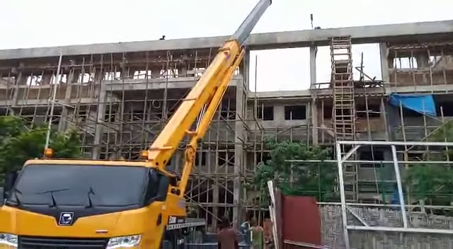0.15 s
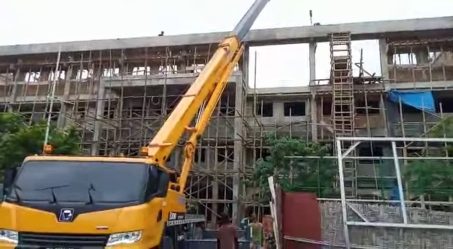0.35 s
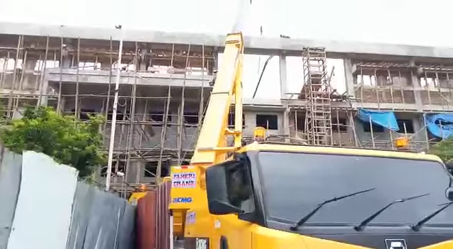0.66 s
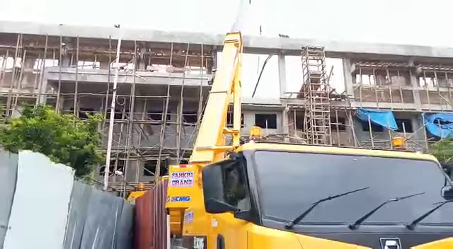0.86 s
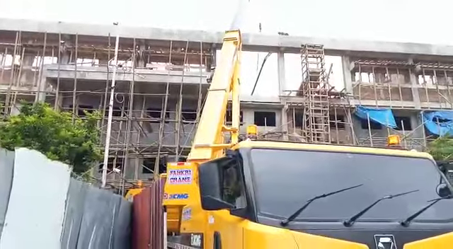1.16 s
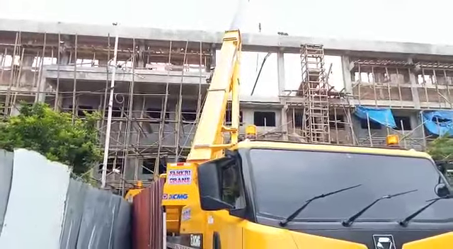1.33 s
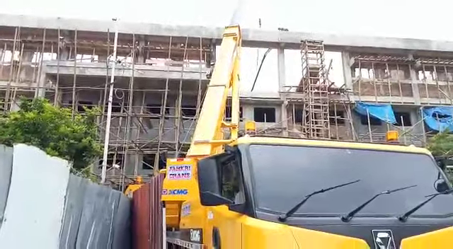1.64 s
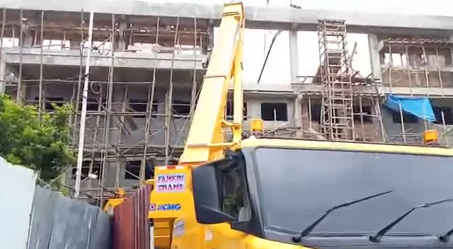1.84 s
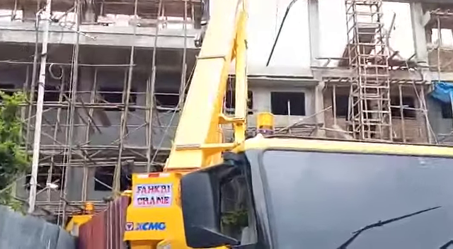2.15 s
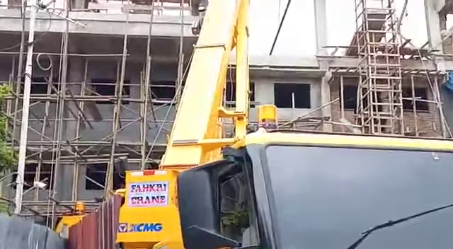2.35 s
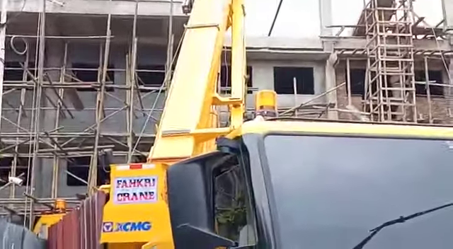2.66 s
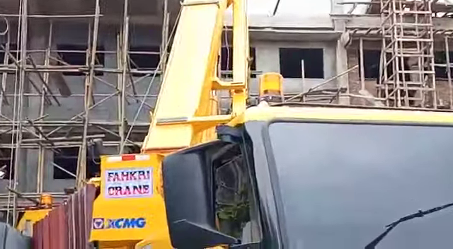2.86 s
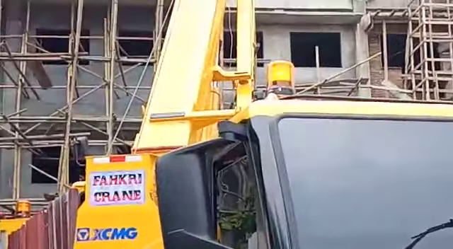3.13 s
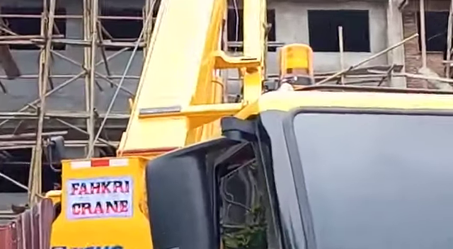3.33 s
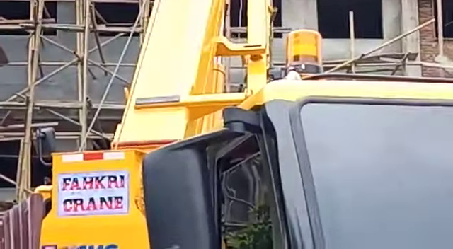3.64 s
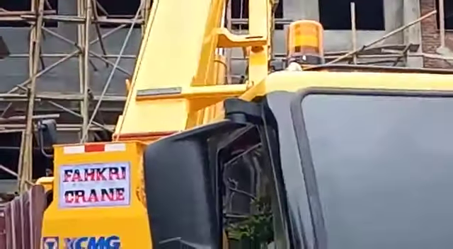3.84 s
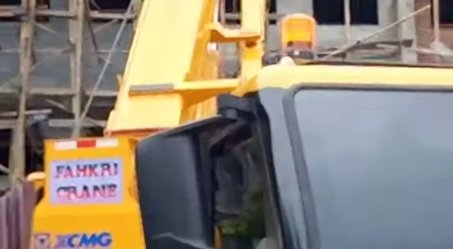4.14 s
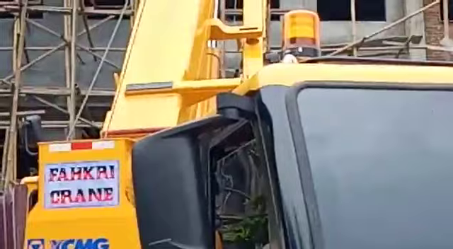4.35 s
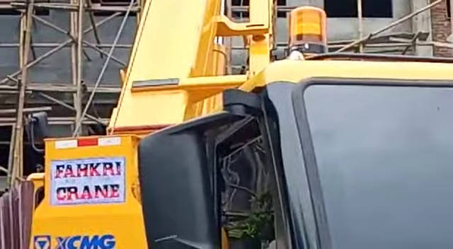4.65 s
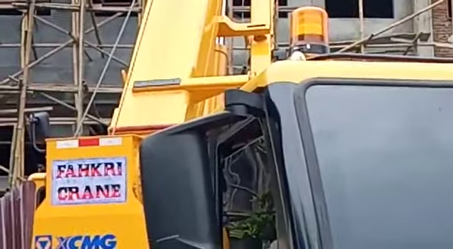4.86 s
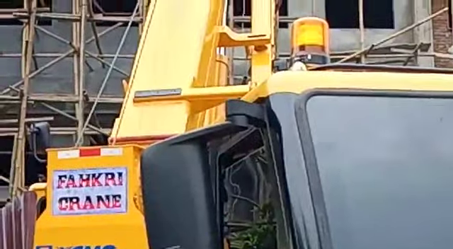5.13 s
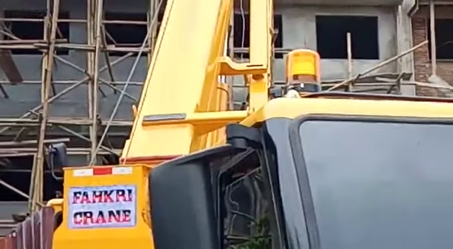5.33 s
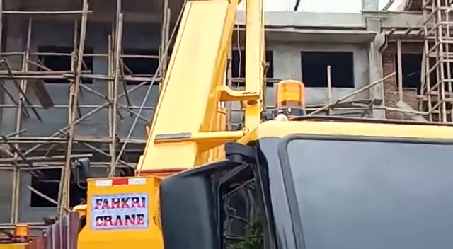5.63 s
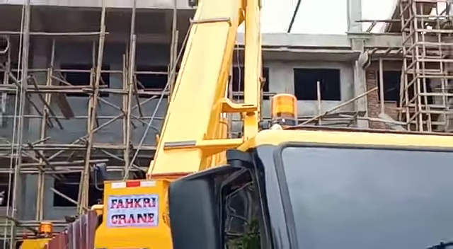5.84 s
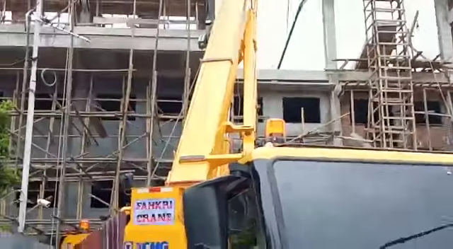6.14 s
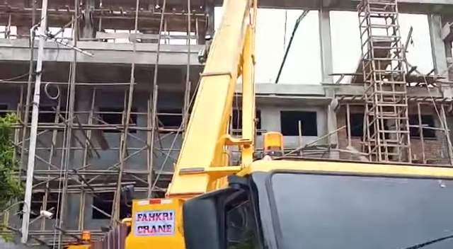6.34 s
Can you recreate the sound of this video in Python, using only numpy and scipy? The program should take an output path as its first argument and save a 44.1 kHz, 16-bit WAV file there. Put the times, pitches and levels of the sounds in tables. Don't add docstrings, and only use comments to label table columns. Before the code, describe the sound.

Steady heavy diesel idle on a building site: humming pumps, rattling valves and roaring cooling air, with one very brief early dropout and small click.

```python
import sys
import numpy as np
from scipy import signal
from scipy.fft import rfft, irfft, next_fast_len
from scipy.io import wavfile
from scipy.ndimage import uniform_filter1d, map_coordinates

SR = 44100
rng = np.random.default_rng(int(sys.argv[2]) if len(sys.argv) > 2 else 0)


def attenuation_scalar(level_db):
    decades = np.asarray(level_db, float) / 20
    return 10 ** decades


def store_pcm(level_fs):
    pcm = np.round(np.clip(level_fs, -1, 1) * 32767).astype(np.int16)
    wavfile.write(sys.argv[1], SR, np.atleast_2d(pcm).T)


N = 286209
T_S = np.arange(N) / SR
FFT_SIZE = next_fast_len(N)
HZ = np.fft.rfftfreq(FFT_SIZE, 1 / SR)

CYCLE_HZ = 6.6655
SPLICE_S = 0.398


def level(x, rms_db):
    return x * attenuation_scalar(rms_db) / np.sqrt(np.mean(x ** 2))


def shape(points):
    hz, db = np.transpose(points)
    return attenuation_scalar(np.interp(np.log(HZ + 1), np.log(hz), db))


def colour(x, gain):
    return irfft(rfft(x, FFT_SIZE) * gain, FFT_SIZE)[:N]


def walk(rate_hz):
    hold = int(SR / rate_hz)
    held = np.repeat(rng.standard_normal(N // hold + 1), hold)
    slewed = uniform_filter1d(uniform_filter1d(held, hold), hold)
    return 1.3 * slewed[:N]


def sine(turns):
    return np.sqrt(2) * np.sin(2 * np.pi * turns)


def crank_cycles():
    wander_s = 110e-6 * walk(1.2) + 22e-6 * walk(5)
    return CYCLE_HZ * (T_S + wander_s)


def cycle_pattern():
    # (block thud [dB], injector tick [dB], valve clack [dB])
    cylinders = [(-7, -12, -7), (0, -1, -8), (-12, -8, -9), (-7, -5, -12), (-3, -5, 0), (-5, -1, -7)]
    thud_hz, tick_hz, clack_hz = (650, 1193), (2510, 3250), (710, 1220, 1885, 2644)
    first_firing_s, valve_lag_s = 0.014, 0.0085
    rise_s, decay_s = 0.0004, 0.0018

    size = int(SR / CYCLE_HZ)
    t = np.arange(size) / SR
    wave = rng.standard_normal(size)
    envelope = np.ones(size)
    scatter_s = 0.0025 * rng.standard_normal((len(cylinders), 3))
    for k, strengths_db in enumerate(cylinders):
        fires_s = first_firing_s + k / len(cylinders) / CYCLE_HZ
        starts_s = fires_s + np.array([0, 0, valve_lag_s]) + scatter_s[k]
        for start_s, knock_db, rings_hz in zip(starts_s, strengths_db, (thud_hz, tick_hz, clack_hz)):
            age_s = (t - start_s) % (size / SR)
            burst = np.exp(-age_s / decay_s) * (1 - np.exp(-age_s / rise_s))
            ringing = sum(np.sin(2 * np.pi * hz * age_s) for hz in rings_hz)
            wave += attenuation_scalar(knock_db + 3) * burst * ringing
            envelope += attenuation_scalar(knock_db - 8) * burst
    return wave / wave.std(), envelope / envelope.mean()


def air(envelope):
    out, swell = 0, walk(0.62)
    for centre_hz in 30 * 2.0 ** np.arange(10):
        octaves = np.clip(np.log2((HZ + 1) / centre_hz), -1, 1)
        band = colour(rng.standard_normal(N), np.cos(np.pi / 2 * octaves))
        puff = envelope if centre_hz > 400 else 1
        flicker_db = 0.2 * swell + 0.35 * walk(2) + 0.7 * walk(10)
        out = out + band * puff * attenuation_scalar(flicker_db)
    return out / out.std()


def brightening_db():
    facing_db, turn_s = 2.5, 0.5
    return_s, return_db_per_s = 5.2, 0.7
    since_s = np.maximum(T_S - SPLICE_S, 0)
    facing = facing_db * np.exp(-(since_s / turn_s) ** 2)
    return facing + return_db_per_s * np.maximum(T_S - return_s, 0)


def engine_noise():
    # (frequency [Hz], density [dB per Hz])
    rumble_colour = [(12, -65.5), (20, -40.5), (66, -11), (123, 3), (161, 3), (244, -2), (295, 0), (346, 1),
                     (419, -4), (468, -6.5), (549, -9), (676, -18), (900, -23), (1170, -43), (1980, -120)]
    # (frequency [Hz], density [dB per Hz])
    roar_colour = [(400, 2.5), (546, -1.5), (745, -2.5), (1400, -3.5), (2630, -1), (3280, -11),
                   (3900, -12.5), (4330, -19.5), (4560, -28), (4900, -32), (5500, -38.5), (6200, -32.5),
                   (7300, -34), (8500, -45), (10000, -62)]
    # (frequency [Hz], bandwidth [Hz], lift [dB])
    panels = [(680, 77, 3), (837, 50, 1), (1003, 270, 4.5), (1653, 140, 3.5), (2490, 200, -2),
              (3494, 63, 7.5), (6600, 300, 1), (7200, 400, 0.5)]
    # (frequency [Hz], level [dB])
    repeat_share = [(60, -10), (300, -10), (700, -10), (1200, -6), (1800, -7.5), (2700, -4.5), (3900, -8),
                    (6000, -15)]
    roar_db, sag_db_per_s = -22, -0.04
    surge_db, surge_s = 1.5, 0.35

    wave, envelope = cycle_pattern()
    place = crank_cycles() % 1 * len(wave)
    clatter = map_coordinates(wave, [place], order=3, mode="grid-wrap")
    puffs = np.interp(place, np.arange(len(wave)), envelope)
    share = shape(repeat_share)
    source = colour(clatter, share) + colour(air(puffs), np.sqrt(1 - share ** 2))

    housing = attenuation_scalar(sum(lift_db / (1 + (2 * (HZ - hz) / width_hz) ** 2) for hz, width_hz, lift_db in panels))
    handover = np.clip(np.log2((HZ + 1) / 450), 0, 1) * np.pi / 2
    rumble = level(colour(source, shape(rumble_colour) * np.cos(handover)), -5.0)
    roar = level(colour(source, shape(roar_colour) * housing * np.sin(handover)), -0.83)
    treble = colour(roar, np.interp(HZ, [2600, 3600, 4800, 6000], [0, 1, 1, 0.3]))
    roar = roar + treble * (attenuation_scalar(brightening_db() - 0.87) - 1)

    since_s = np.maximum(T_S - SPLICE_S, 0)
    gain_db = roar_db + sag_db_per_s * since_s + surge_db * np.exp(-since_s / surge_s)
    return (rumble + roar) * attenuation_scalar(gain_db)


def machine_tones():
    # (base [Hz], wobble [dB], partials (multiple, level [dB rms]))
    families = [
        (172.285, .6, [(1, -29), (2, -28), (3, -51), (4, -46), (5, -49), (6, -47), (12, -44)]),
        (155.04, 2, [(1, -43), (2, -43), (3, -50), (4, -49), (5, -48)]),
        (496.19, 2, [(1, -50), (2, -44), (3, -46), (4, -50)]),
        (20.5, 2, [(2, -70), (3, -57), (4, -51), (5, -43), (6, -44), (7, -43), (11, -48), (20, -48)]),
        (12.42, 2, [(6, -43), (7, -45), (8, -45), (11, -45), (15, -47), (19, -49), (23, -46)]),
        (6.6655, 1.5, [(6, -64), (8, -55), (9, -61), (12, -43), (18, -46), (22, -43), (39, -42)]),
        (6.6655, 1.5, [(70, -39.5), (100, -43), (120, -46), (160, -46), (162, -43), (168, -46), (178, -47)]),
    ]
    out = 0
    for base_hz, wobble_db, partials in families:
        turns = base_hz * (T_S + 30e-6 * walk(1.5))
        for multiple, rms_db in partials:
            swell = attenuation_scalar(rms_db + wobble_db * walk(3.03))
            out = out + swell * sine(multiple * turns + rng.random())
    return out


def turbo():
    # (pitch [Hz], wander [Hz], level [dB rms])
    whistle = (3512, 15, -49.5)
    centre_hz, wander_hz, rms_db = whistle
    pitch_hz = centre_hz + wander_hz * (walk(5) + 0.6 * walk(40))
    swell = attenuation_scalar(rms_db + brightening_db() + 2.2 * walk(9.8))
    return swell * sine(np.cumsum(pitch_hz) / SR)


def far_spot(near):
    # (frequency [Hz], level [dB])
    far_colour = [(60, -0.5), (124, -1.5), (172, -7), (240, 2), (345, -8.5), (600, -1.5), (1200, -3),
                  (3000, -2.5), (8000, -3), (12000, -10.5)]
    return colour(np.roll(near, -int(SR / CYCLE_HZ) * 20), shape(far_colour))


def site():
    # (frequency [Hz], centre [s], spread [s], peak [dB rms])
    boom_swells = [(124, .135, .05, -26), (156, 5.7, .08, -27)]
    # (frequency [Hz], level [dB rms])
    faint_whines = [(6552, -76), (6655, -77), (7036, -79)]
    out = 0
    for hz, centre_s, spread_s, peak_db in boom_swells:
        swell = np.exp(-0.5 * ((T_S - centre_s) / spread_s) ** 2)
        out = out + attenuation_scalar(peak_db) * swell * sine(hz * T_S)
    for hz, rms_db in faint_whines:
        pitch_hz = hz + 4 * walk(7.9)
        out = out + attenuation_scalar(rms_db + 2 * walk(4)) * sine(np.cumsum(pitch_hz) / SR)
    return out


def scene():
    near = engine_noise() + machine_tones() + turbo()
    cross = np.clip((T_S - SPLICE_S) / 0.003 + 0.5, 0, 1)
    click = attenuation_scalar(-26) * (T_S >= SPLICE_S) * np.exp(-np.abs(T_S - SPLICE_S) / 0.0003)
    return (far_spot(near) * (1 - cross) + near * cross + click + site())[None]


def band_limit(x):
    return signal.sosfilt(signal.butter(12, 15504, fs=SR, output="sos"), x)


def record(dry):
    # (frequency [Hz], density [dB per Hz])
    hiss_colour = [(20, -4), (8000, -0.5), (10500, 2), (11300, 2), (12300, -4), (13600, 1.5), (14400, -1),
                   (15400, -1)]
    drop_s, back_s = 0.2462, 0.3582
    settle_db = np.where(T_S < SPLICE_S, -5, 5 * np.exp(-np.abs(T_S - SPLICE_S) / 0.45))
    hiss = level(colour(rng.standard_normal(N), shape(hiss_colour)), -74.5) * attenuation_scalar(settle_db)

    closing = np.clip((drop_s - T_S) / 0.003 + 0.5, 0, 1) ** 2
    opening = np.sin(np.pi / 2 * np.clip((T_S - back_s) / 0.0014 + 0.3, 0, 1)) ** 2
    fade_in = np.clip(T_S / 0.001, 0, 1)
    return band_limit((dry + hiss) * (closing + opening) * fade_in)


dry = scene()
out = record(dry)
store_pcm(out)
```